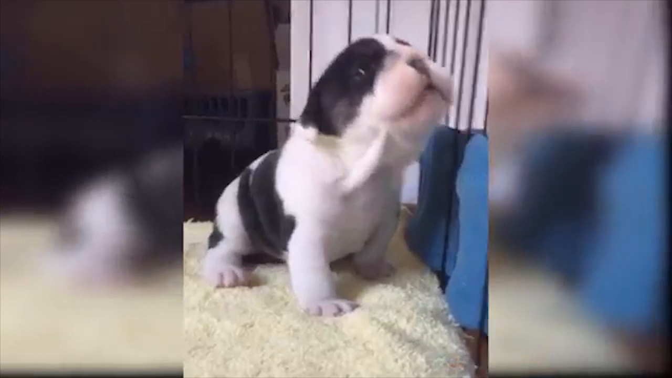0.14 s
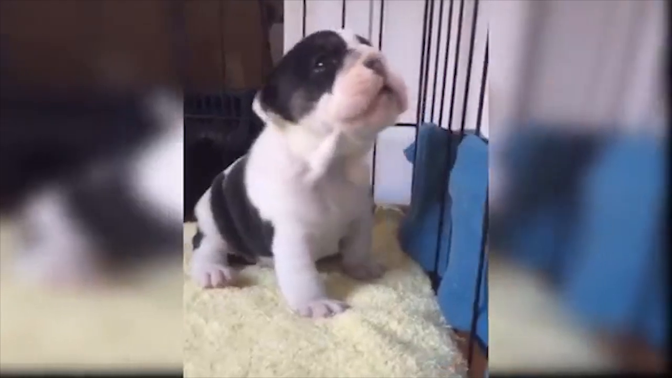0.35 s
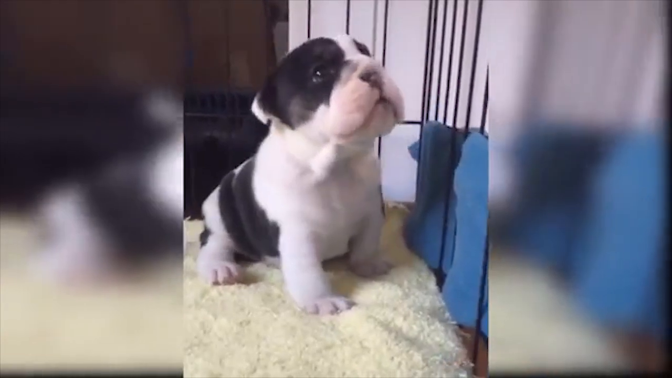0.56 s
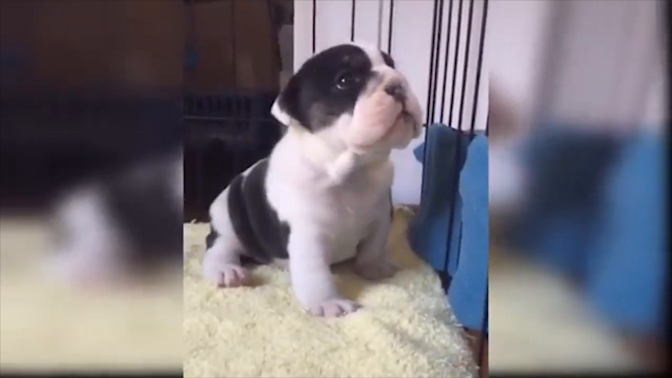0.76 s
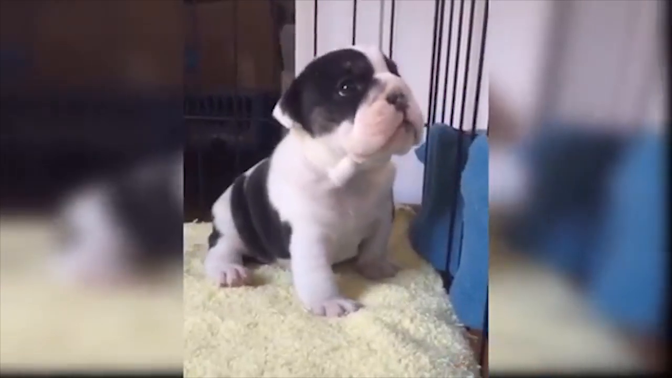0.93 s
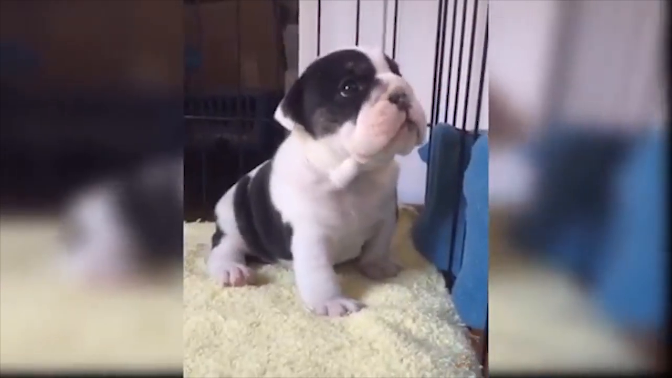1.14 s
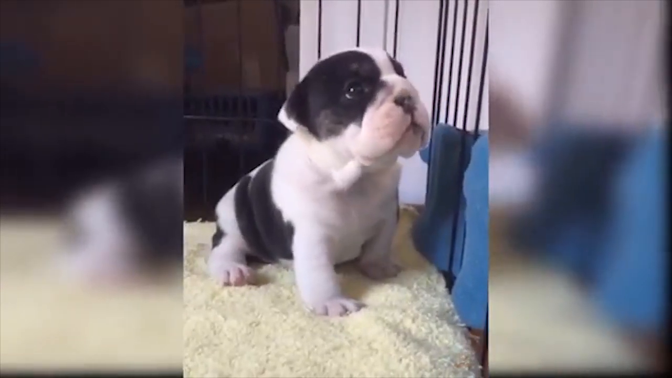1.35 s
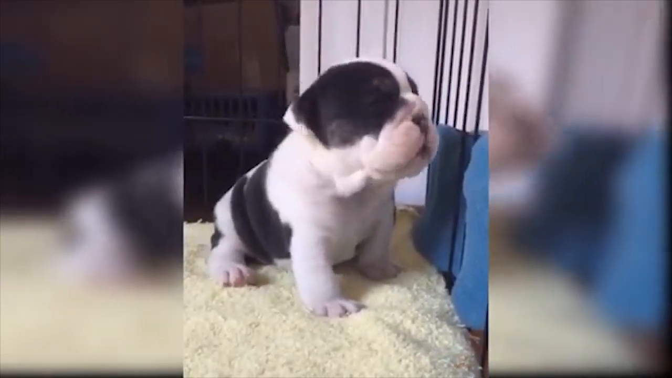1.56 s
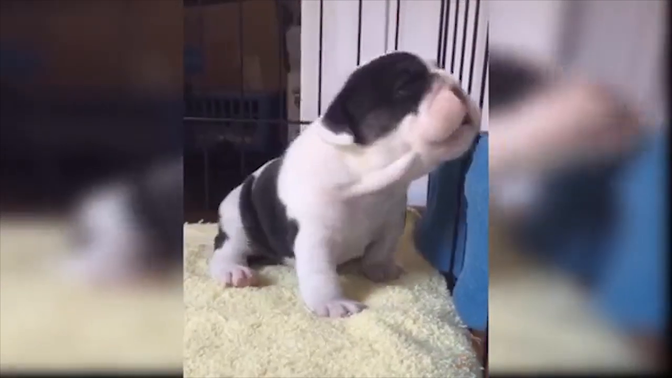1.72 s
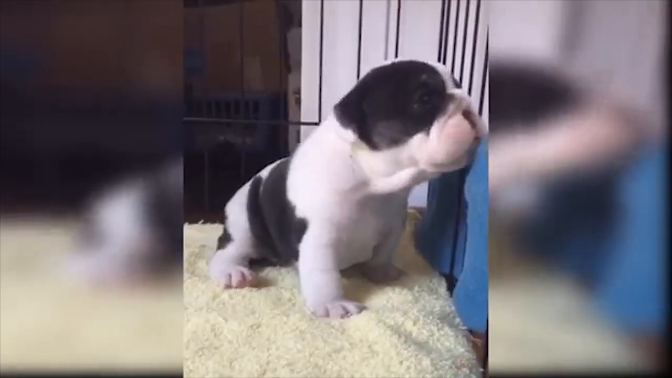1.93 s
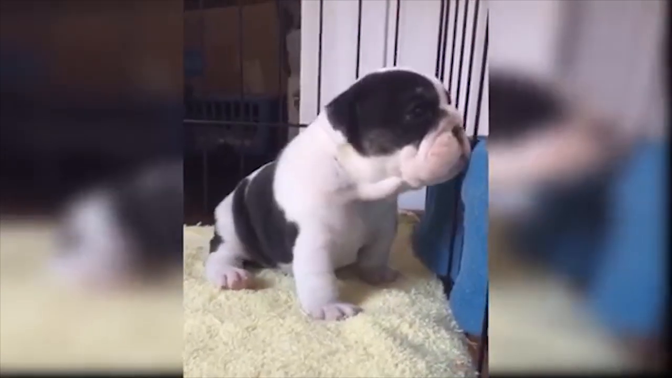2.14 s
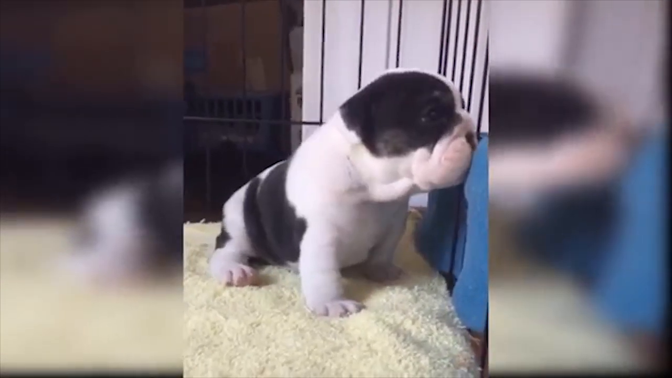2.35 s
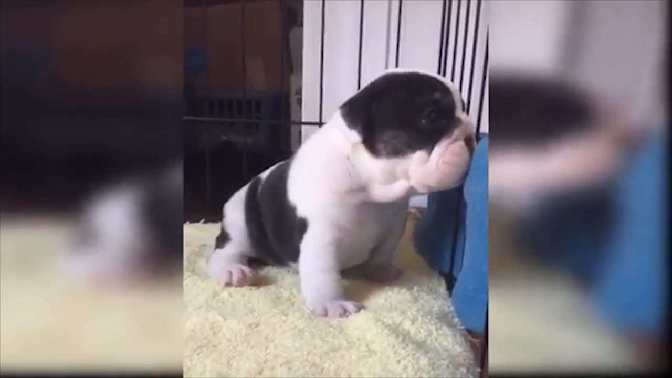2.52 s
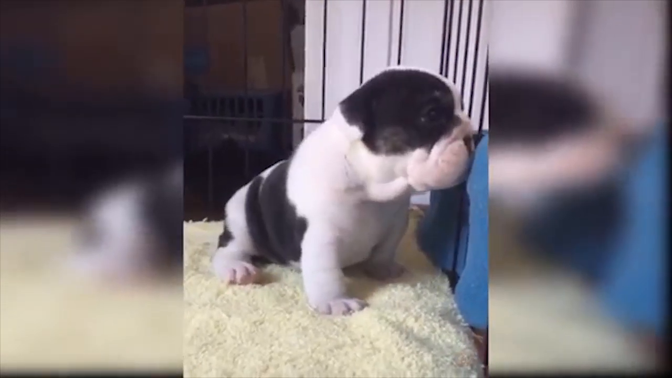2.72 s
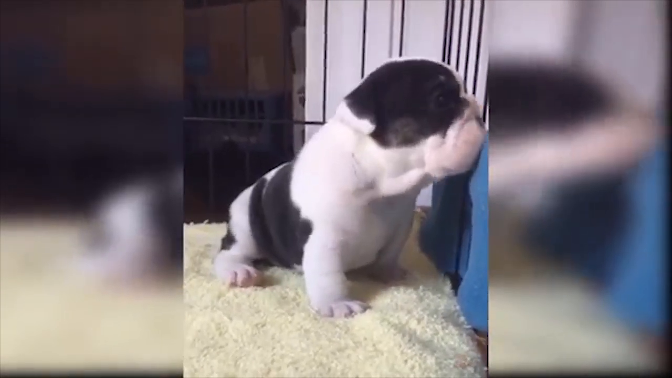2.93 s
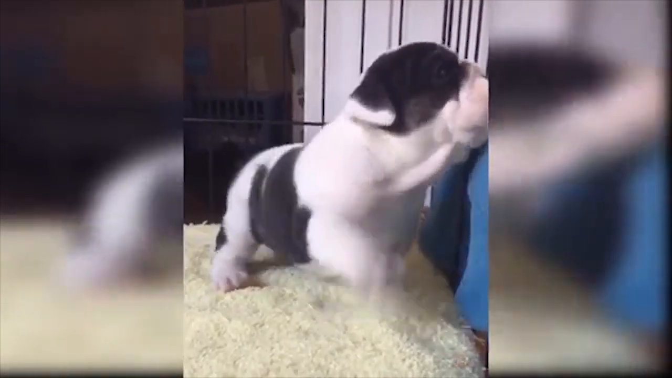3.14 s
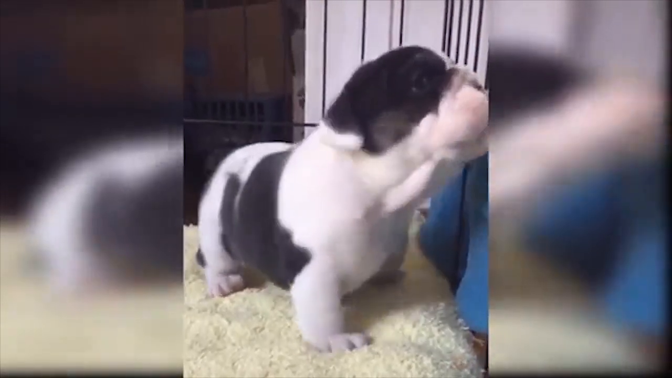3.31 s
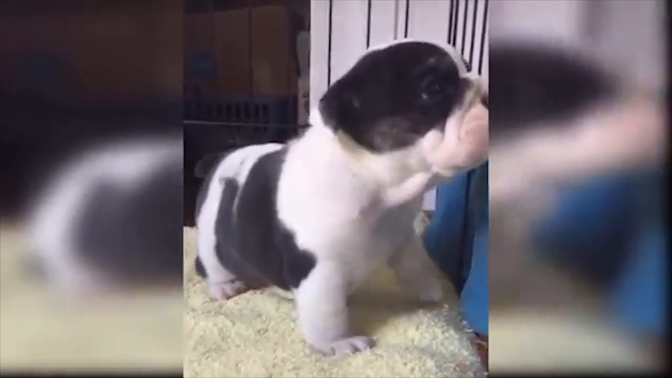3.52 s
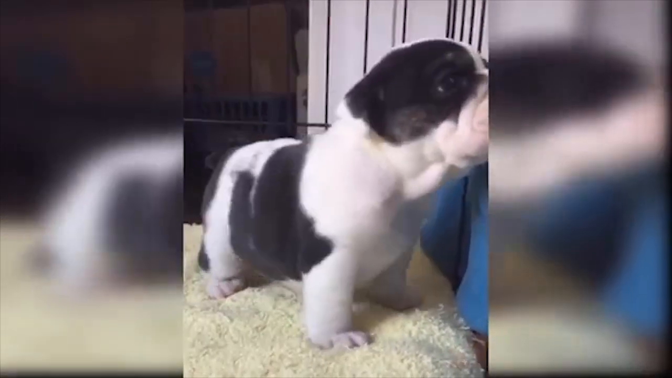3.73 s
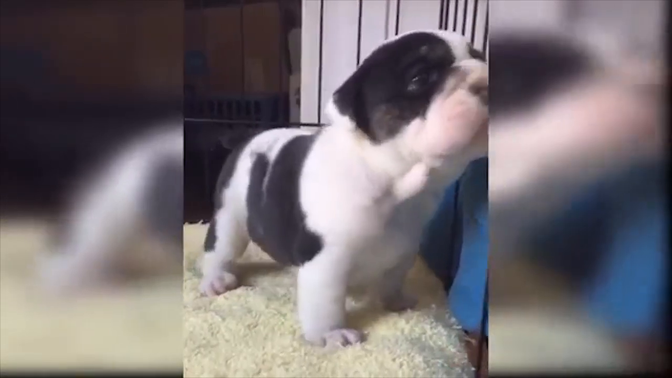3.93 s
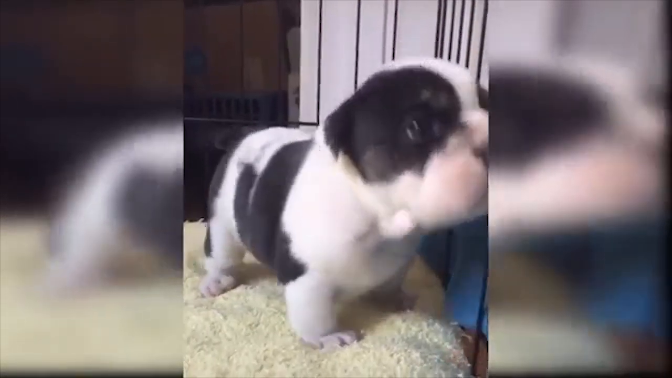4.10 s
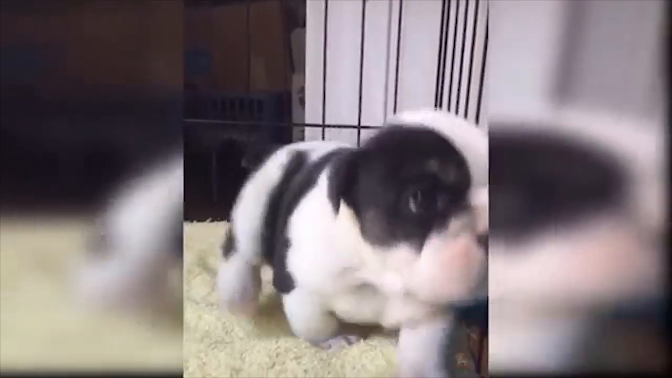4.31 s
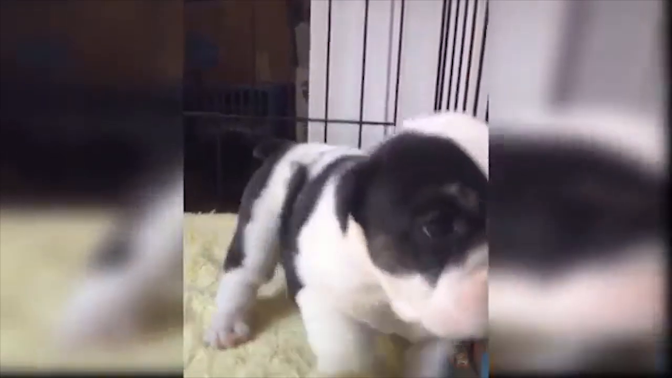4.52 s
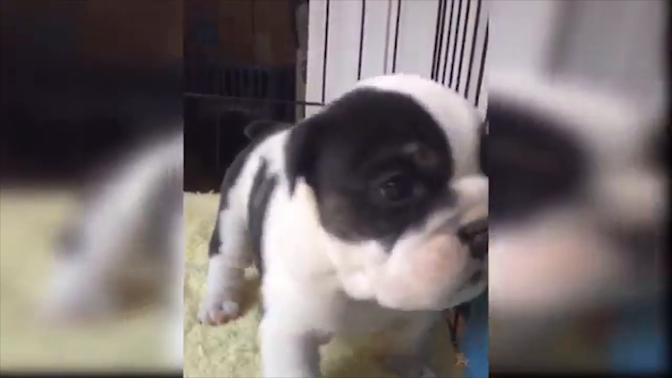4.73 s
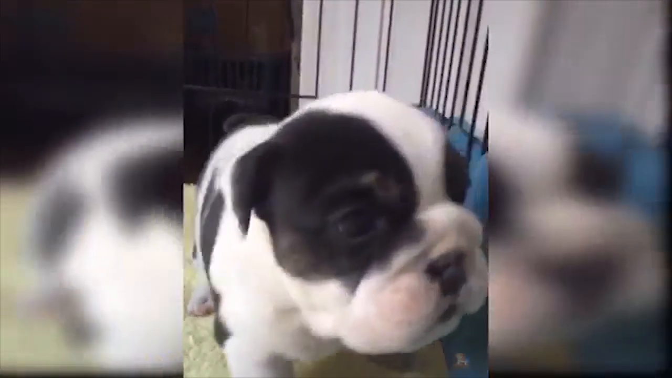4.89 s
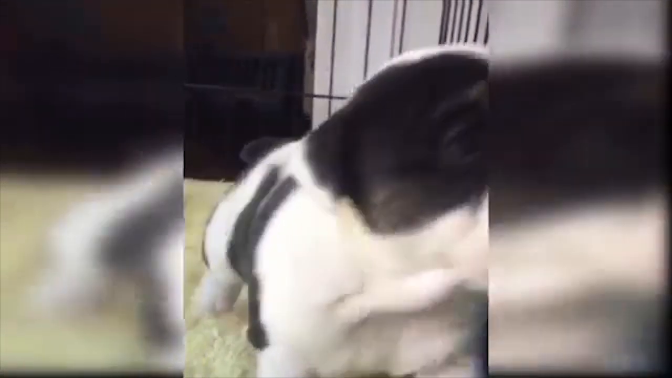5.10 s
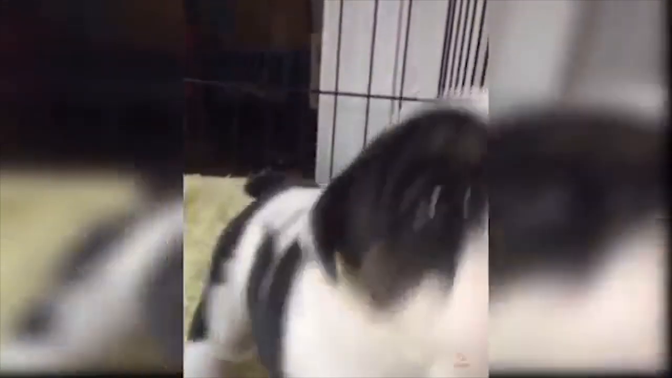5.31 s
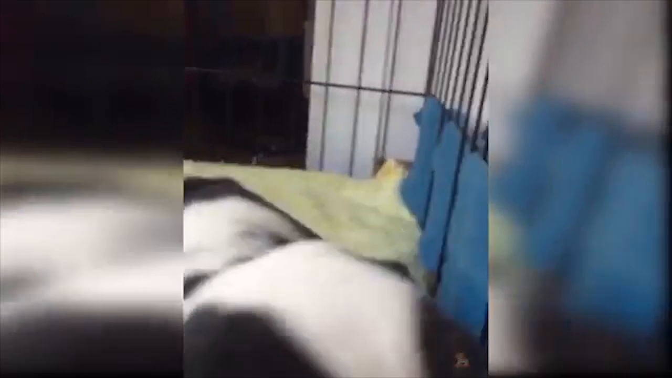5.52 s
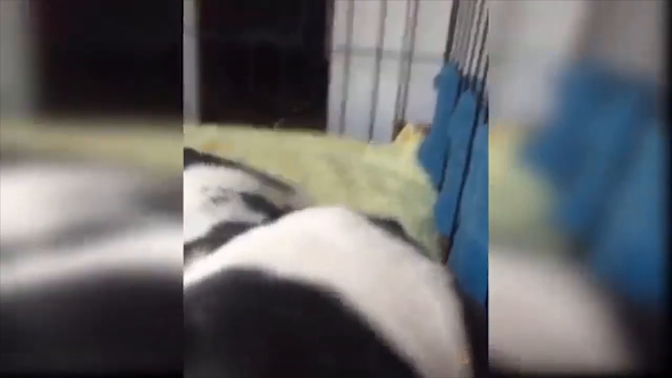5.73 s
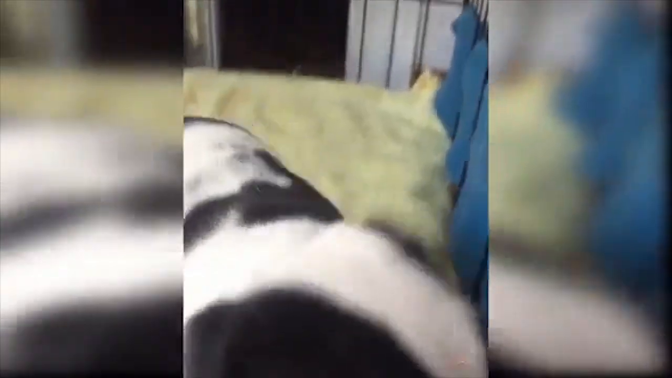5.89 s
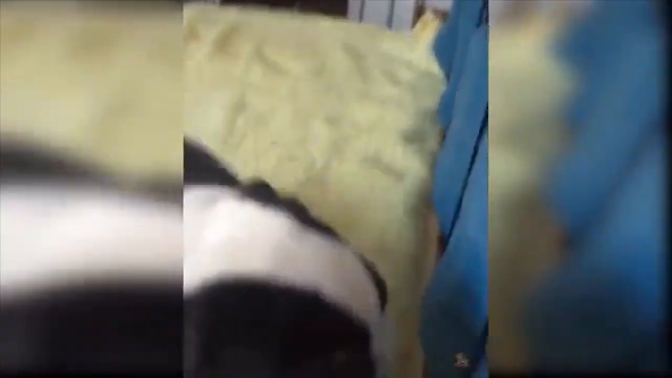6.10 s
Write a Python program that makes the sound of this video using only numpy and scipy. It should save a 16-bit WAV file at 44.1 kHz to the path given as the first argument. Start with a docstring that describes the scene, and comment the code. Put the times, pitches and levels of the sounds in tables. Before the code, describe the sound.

A low motor hum, gently wavering, and a dull rush of air run throughout a small room. At 0.2 s a puppy close to the microphone gives a loud, short yap of about 0.2 s, its pitch leaping up and falling back, raspy and overloaded, with a quick reflective echo. A barely audible wire tick comes at 1.2 s. At 1.7 s a second similar yap swells a little more gradually. At 3.25 s a third is smaller, quieter and much higher, cracking into a squeak. Very faint brushing and wire ticks follow around 4.2 to 4.6 s, with a soft bump at 4.3 s. From 5.0 s cloth rustles grow closer; muffled bumps and grainy scuffs cluster from 5.25 to 5.55 s, then the strongest padded knock with a crisp brush lands at 5.65 s. Light rustles fade into the hum by 6 s.

```python
"""A bulldog puppy yaps three times in a blanket-lined pen, close enough to overload the microphone.
Each yap is a stack of harmonics arching up and down in pitch through a sliding jaw, with rasp and hiss.
As the puppy walks up, noise pushes ring the pen as bumps and grainy noise brushes the blanket.
Faint wire ticks, panel reflections and two noise echoes place it in a small room.
Wavering sines make a motor hum over the noise of moving air."""
import sys
import numpy as np
from scipy import signal
from scipy.fft import rfft, irfft
from scipy.io import wavfile
from scipy.ndimage import map_coordinates

SR = 44100
rng = np.random.default_rng(int(sys.argv[2]) if len(sys.argv) > 2 else 0)


def generate_wav(sig):
    """Save sig (samples, or channels by samples) to the path in sys.argv[1] as 16-bit PCM at SR."""
    pcm = np.round(np.clip(np.atleast_2d(sig).T, -1, 1) * 32767).astype(np.int16)
    wavfile.write(sys.argv[1], SR, pcm)


N = 271391
TIME = np.arange(N) / SR
TOP_HZ = 15000  # upper limit of the harmonics and of the microphone

# Throat and mouth resonances with the jaw nearly shut, half open and wide.
# Columns: centre_hz, width_hz, level_db
JAW_NEARLY_SHUT = [(914, 240, 0.5), (1400, 220, -7), (2080, 150, 4.5), (2790, 180, -26), (3329, 250, -31.5),
                   (3930, 400, -27), (7240, 1700, -42.5)]
JAW_HALF_OPEN = [(980, 320, 6), (1391, 150, -1.5), (2193, 160, -0.5), (2694, 150, -3), (3140, 220, -12.5),
                 (4775, 820, -20.5), (6700, 730, -29.5)]
JAW_WIDE_OPEN = [(878.6, 210, -7.5), (1564, 280, 7), (1880, 200, 1), (2876, 400, -8), (3500, 250, -15.5),
                 (4046, 290, -2), (6870, 390, -19.5)]
# Moments when the voice breaks: it rasps, falters or repeats only every third cycle.
# Columns: start_s, length_s, added_roughness_0_to_1, undertones_0_to_1, level_change_db
VOICE_BREAKS = [(0.249, .05, .55, 0, -0.5), (.3, .02, .05, 0, -5.5), (1.833, 0.026, 0.01, 0, -6),
                (3.285, 0.087, 0.06, 1, -2)]
BREAK_EDGE_S = 0.006  # slipping into and out of a break
# A yap without effort: its level change, and its loss of brightness per octave
SOFT_DB, SOFT_DULL_DB = -28, 8.5
START_S, STOP_S = 0.005, 0.0075  # the air starts and stops
# Slack folds rattle; below this effort the voiced part fades
SLACK_ROUGH, SLACK_POWER, VOICED_EFFORT = 0.55, 1.6, 0.16
# At this effort the folds catch, and the voice jumps to full strength within this time
CATCH_EFFORT, CATCH_S = 0.55, 0.0055
# The jaw drops from full effort on and is shut again a linger after the hold
JAW_OPEN_S, JAW_CLOSE_S, JAW_LINGER_S = 0.016, 0.055, 0.066
LEAK_DB = 11.5  # the hiss gains this much on the voice in the course of a yap
BRIGHT_TOP_HZ = 4500  # brightness lifts the harmonics up to here


def yap(row, arch, jitter=0.077, shimmer=0.74, flutter_hz=750, wobble=0.06, wobble_hz=160,
        rasp_db=-5, size=60):
    """Vocal folds make a stack of harmonics; when pushed they beat unevenly and chop the air into rasp."""
    start, attack, hold, release, first_effort, peak_db, jaw, brightness, roughness, hiss_db = row
    length = attack + hold + release
    t = np.arange(start, start + length, 1 / SR)
    count = len(t)
    hz = np.interp(t, *np.transpose(arch))

    # effort swells, holds and ebbs: it makes the voice loud, bright and clear
    effort_times = [0, attack - CATCH_S, attack, attack + hold, length]
    effort = np.interp(t - start, effort_times, [first_effort, CATCH_EFFORT, 1, 1, 0]).clip(0, 1)
    slack = 1 - effort
    bright = brightness - SOFT_DULL_DB * slack
    broken, undertones, break_db = sum(
        np.outer(amounts, trapezoid(t, break_start, span, BREAK_EDGE_S, BREAK_EDGE_S))
        for break_start, span, *amounts in VOICE_BREAKS)
    air = trapezoid(t, start, length, START_S, STOP_S)
    gain = undb(peak_db + SOFT_DB * slack + break_db) * air
    rough = roughness + SLACK_ROUGH * slack ** SLACK_POWER + broken

    # the period is uneven from cycle to cycle and staggers over several cycles
    uneven = jitter * wander(flutter_hz, count) + wobble * wander(wobble_hz, count)
    phase = 2 * np.pi * np.cumsum(hz * (1 + rough * uneven)) / SR

    # the jaw drops quickly and closes slowly, and the resonances slide with it
    opening = jaw * trapezoid(t, start + attack, hold + JAW_LINGER_S, JAW_OPEN_S, JAW_CLOSE_S)
    shapes = np.stack([JAW_NEARLY_SHUT, JAW_HALF_OPEN, JAW_WIDE_OPEN], axis=-1)
    mouth = [[np.interp(opening, [0, 0.5, 1], values) for values in mode] for mode in shapes]

    # whole multiples of the pitch always sound, the thirds between them only in a cracked voice
    k = np.arange(1, size + 1)[:, None] / 3
    tilt = undb(bright * np.log2(np.minimum(k, BRIGHT_TOP_HZ / hz)))
    folds = np.where(k % 1 == 0, 1, undertones) * tilt
    weight = folds * throat(k * hz, mouth) * (k * hz < TOP_HZ)
    # each resonance adds a phase lag to the harmonics that lie above it
    lag = sum(2 * np.arctan((k * hz - centre) / width) for centre, width, _ in mouth)
    harmonics = np.sum(weight * np.cos(k * phase - lag), axis=0)
    voice = harmonics / np.sqrt(np.sum(weight ** 2, axis=0) / 2)
    voice = voice * (1 + shimmer * rough * wander(flutter_hz, count))
    voice = voice * np.minimum(effort / VOICED_EFFORT, 1)

    # turbulence rings each resonance and hisses past the teeth, in one puff per cycle
    puffs = 1 + 0.5 * np.cos(phase)
    rasp = unit(sum(
        undb(db) * wander(2 * width.mean(), count) * np.cos(2 * np.pi * np.cumsum(centre) / SR)
        for centre, width, db in mouth))
    teeth = [(1000, -15.5), (3500, -2), (5200, -6.5), (6600, 0), (9000, 0.5), (11500, -7.5), (14000, -18)]
    hiss = noise(teeth, count)
    hiss_gain = undb(hiss_db + LEAK_DB * (t - start) / length)
    return gain * (voice + puffs * (rough * undb(rasp_db) * rasp + hiss_gain * hiss))


def throat(hz, modes):
    """Gain of the throat at given frequencies; steep skirts keep the bass dark."""
    return sum(undb(db) / (1 + ((hz - centre) / width) ** 2) ** 1.1 for centre, width, db in modes)


# The yaps. Columns: start_s, attack_s, hold_s, release_s, starting_effort_0_to_1, level_db,
# widest_jaw_0_to_1, brightness_db_per_octave, roughness_0_to_1, starting_hiss_db
YAP_EVENTS = [(0.208, .018, .057, 0.13, .08, 0.5, .88, 6, .08, -24),
              (1.718, .050, 0.076, 0.094, 0, -.5, 0.91, 5.5, 0.13, -28),
              (3.245, 0.024, .060, 0.082, 0.58, -8.5, 0.59, 4, 0.08, -37.5)]
# The pitch arch of each yap. Columns: time_s, pitch_hz
PITCH_ARCHES = [
    [(0.212, 464.2), (0.226, 653.6), (0.236, 748.3), (0.258, 926.3), (0.296, 959.7), (0.34, 573.6),
     (0.35, 503), (0.388, 380), (0.4, 372)],
    [(1.752, 464.7), (1.772, 612.6), (1.804, 870.7), (1.822, 927.4), (1.85, 869), (1.872, 648.5),
     (1.882, 588), (1.902, 446.4), (1.92, 410.5)],
    [(3.25, 655), (3.264, 741), (3.269, 998), (3.274, 1048), (3.277, 1310), (3.304, 1547), (3.32, 1359),
     (3.338, 1344), (3.348, 1028), (3.395, 844)],
]


def puppy():
    """Two wide-mouthed yaps and a smaller, cracking one."""
    out = np.zeros(N)
    for row, arch in zip(YAP_EVENTS, PITCH_ARCHES):
        add(out, row[0], yap(row, arch))
    return cancel(out)


# Pitches that cancel between the puppy and the microphone. Columns: centre_hz, width_hz, depth_db
PATH_NULLS = [(1057, 130, -6.5), (1690, 100, -10.5), (2380, 160, -7), (5087, 1000, -6.5)]


def cancel(x):
    """Hollow out the voice at each pitch that cancels on its way to the microphone."""
    for hz, width, db in PATH_NULLS:
        x = x + (undb(db) - 1) * resonate(x, [(hz, width, 0)])
    return x


# Soft bumps in the pen. Columns: start_s, level_db, contact_s, pitch_hz
PEN_BUMPS = [(4.272, -27, 0.0071, 250), (5.245, -21.5, 0.0084, 852.5), (5.263, -25, 0.0058, 278.6),
             (5.35, -26, 0.013, 70.5), (5.407, -26, 0.018, 326), (5.53, -31.5, 0.0069, 347),
             (5.645, -11.5, 0.0047, 632), (5.662, -27, 0.037, 383)]
# What a bump rings with. Columns: centre_hz, width_hz, level_db
PEN_MODES = [(85.6, 59, 4), (250, 160, 4), (410.5, 74, -1), (570.4, 157, 1), (640, 176, 5),
             (1176, 144, -7.5)]


def bumps():
    """A padded, uneven push rings the pen, mostly the modes near its own pitch."""
    out, t = np.zeros(N), TIME[:SR // 4]
    for start, db, contact, hz in PEN_BUMPS:
        push = rng.standard_normal(len(t)) * t / contact * np.exp(-t / contact * 2)
        band = signal.butter(1, [hz / 2, hz * 2], "band", fs=SR, output="sos")
        ring = resonate(signal.sosfilt(band, push), PEN_MODES)
        add(out, start, undb(db) * ring / np.max(np.abs(ring)))
    return out


# Fur and paws brushing cloth. Columns: start_s, level_db, rise_s, decay_s, strongest_pitch_hz
CLOTH_BRUSHES = [(2.85, -65.5, 0.021, .05, 9030), (4.59, -62, 0.016, .03, 9000),
                 (5.025, -47.5, .01, 0.016, 8000), (5.26, -43.5, 0.029, 0.046, 2050),
                 (5.363, -48, 0.0057, 0.037, 8600), (5.403, -32, 0.003, 0.028, 1706),
                 (5.534, -49.5, 0.022, 0.057, 2420), (5.644, -26.5, 0.0037, 0.016, 8500),
                 (5.665, -35, .004, 0.038, 1400), (5.736, -45, 0.0038, 0.028, 6430),
                 (5.844, -49.5, .005, .025, 3270)]
# Colour of rubbed cloth. Columns: frequency_hz, level_db_per_hz
CLOTH_COLOUR = [(200, -0.5), (600, 11), (1100, 0.5), (1800, -4.5), (2600, -6.5), (3300, -6), (4700, -9.5),
                (6200, -7.5), (9000, -10.5), (12700, -12.5), (13500, -30)]


def brushes(grain_db=3, grain_hz=350, fold_db=5, fold_share=0.1):
    """Fibres catch and let go: grainy hiss that swells and dies, coloured anew by each fold of cloth."""
    out, t = np.zeros(N), TIME[:SR // 3]
    for start, db, rise, decay, hz in CLOTH_BRUSHES:
        swell = np.minimum(t / rise, 1) * np.exp(-np.maximum(t - rise, 0) / decay)
        fibres = noise(CLOTH_COLOUR, len(t)) * undb(grain_db * wander(grain_hz, len(t)))
        fold = resonate(fibres, [(hz, fold_share * hz, fold_db)])
        add(out, start, undb(db) * swell * unit(fibres + fold))
    return out


# Faint ticks of the wire pen. Columns: start_s, level_db, pitch_hz
WIRE_TICKS = [(1.235, -46.5, 2110), (4.197, -47.5, 2080), (4.542, -55, 2530)]


def ticks(width_hz=160, contact_s=0.0062):
    """A light touch rings a wire of the pen for a moment."""
    out, t = np.zeros(N), TIME[:SR // 8]
    for start, db, hz in WIRE_TICKS:
        touch = rng.standard_normal(len(t)) * t * np.exp(-t / contact_s)
        ring = resonate(touch, [(hz, width_hz, 0)])
        add(out, start, undb(db) * ring / np.max(np.abs(ring)))
    return out


# First reflections off the floor and the panels of the pen. Columns: delay_ms, level_db
PANEL_REFLECTIONS = [(1.21, -17), (1.97, -16), (2.3, -16), (4.27, -16)]
# Colour of the quick echo in the pen. Columns: frequency_hz, level_db
PEN_ECHO_COLOUR = [(150, -8.5), (900, 10.5), (2800, 3), (4500, -7.5), (5300, -7), (7500, -1),
                   (12000, -14.5), (15000, -25.5)]
# Colour of the room's ring. Columns: frequency_hz, level_db
WALL_COLOUR = [(150, -12), (800, -4), (1350, 0), (1750, 3), (2100, -8), (2550, 2), (3250, -8), (3750, -4),
               (4150, -6), (4550, -3), (4850, -18), (6500, -12), (11000, -11), (14000, -26)]


def room(x, near_db=-21, near_t60_s=0.23, far_db=-32, far_t60_s=0.52):
    """Nearby panels colour the harmonics and scatter a quick echo; the room rings longer and fainter."""
    t = TIME[:SR]
    out = x.copy()
    for ms, db in PANEL_REFLECTIONS:
        add(out, ms / 1000, undb(db) * x)
    for colour, db, t60 in ((PEN_ECHO_COLOUR, near_db, near_t60_s), (WALL_COLOUR, far_db, far_t60_s)):
        # a decaying noise tail, silent for the first 4 ms
        echo = noise(colour, len(t)) * np.exp(-np.log(1000) * t / t60) * (t > 0.004)
        echo = echo / np.sqrt(np.sum(echo ** 2))
        out = out + undb(db) * signal.fftconvolve(x, echo)[:N]
    return out


# Motor hum. Columns: pitch_hz, level_db_rms
MOTOR_HUM = [(60, -46.5), (86, -52), (120, -44)]
# Colour of the moving air in the still room. Columns: frequency_hz, level_db_per_hz
AIR_COLOUR = [(20, -32), (33, -22.5), (50, -8), (75, -8.5), (130, -5.5), (175, -2), (245, -12.5),
              (300, -11.5), (385, -25), (480, -21), (610, -10.5), (800, -18.5), (1200, -27), (1900, -35.5),
              (4500, -45.5), (5200, -47), (13000, -53.5), (13600, -69)]
# Brief dips of the low drone. Columns: start_s, length_s, depth_db
DRONE_DIPS = [(5.557, 0.076, -19), (5.71, 0.033, -16)]
DIP_EDGE_S = 0.017


def background(air_db=-41.5, waver_db=2, drift_rad=0.4, swell_db=0.14, split_hz=380):
    """A motor hums, wavering a little, over the rush of moving air."""
    hum = np.zeros(N)
    for hz, db in MOTOR_HUM:
        level = np.sqrt(2) * undb(db + waver_db * wander(17, N))
        hum += level * np.sin(2 * np.pi * hz * TIME + drift_rad * wander(5, N))
    drone = hum + undb(air_db) * noise(AIR_COLOUR, N)
    # the low part wavers and dips while the hiss stays smooth
    low = signal.sosfiltfilt(signal.butter(3, split_hz, fs=SR, output="sos"), drone)
    dip_db = sum(db * trapezoid(TIME, start, length, DIP_EDGE_S, DIP_EDGE_S)
                 for start, length, db in DRONE_DIPS)
    return drone + low * (undb(dip_db + swell_db * wander(11, N)) - 1)


def undb(db):
    """Decibels to gain."""
    return 10 ** (np.asarray(db) / 20)


def unit(x):
    """Scale to rms 1."""
    return x / np.sqrt(np.mean(x ** 2) + 1e-18)


def add(track, start, sound):
    """Mix a sound into the track at a time in seconds."""
    i = int(start * SR)
    track[i:i + len(sound)] += sound[:N - i]


def noise(points, count):
    """Noise of rms 1 with a spectrum of (Hz, dB) points."""
    hz, db = np.transpose(points)
    f = np.fft.rfftfreq(count, 1 / SR)
    colour = undb(np.interp(np.log(f + 1), np.log(hz), db))
    return unit(irfft(rfft(rng.standard_normal(count)) * colour, count))


def wander(rate_hz, count):
    """Smooth chance of rms 1, a curve through random points at the given rate."""
    steps = np.arange(count) * rate_hz / SR
    return unit(map_coordinates(rng.standard_normal(count), [steps], order=2, mode="mirror"))


def resonate(x, modes):
    """Parallel resonances (Hz, width Hz, dB), alternating in sign to keep the valleys between shallow."""
    out = np.zeros(len(x))
    for k, (hz, width, db) in enumerate(modes):
        peak = signal.iirpeak(min(hz, SR * 0.45), hz / width, fs=SR)
        out += (-1) ** k * undb(db) * signal.lfilter(*peak, x)
    return out


def trapezoid(t, start, length, rise, fall):
    """From 0 up to 1 and back to 0 within a length of time."""
    return np.clip(np.minimum((t - start) / rise, (start + length - t) / fall), 0, 1)


def scene():
    """Puppy and pen in the room, over the hum."""
    pen = puppy() + bumps() + brushes() + ticks()
    return (room(pen) + background())[None]


def record(dry, knee=3.9, lopsided=0.014):
    """The microphone overloads on the yaps, a little more on one side, and the top is cut."""
    bent = dry + lopsided * np.minimum(dry ** 2, 2)
    clipped = bent / (1 + np.abs(bent) ** knee) ** (1 / knee)
    clipped = signal.sosfilt(signal.butter(1, 35, "high", fs=SR, output="sos"), clipped)
    return signal.sosfilt(signal.ellip(8, 0.2, 70, TOP_HZ, fs=SR, output="sos"), clipped)


dry = scene()
out = record(dry)
generate_wav(out)
```